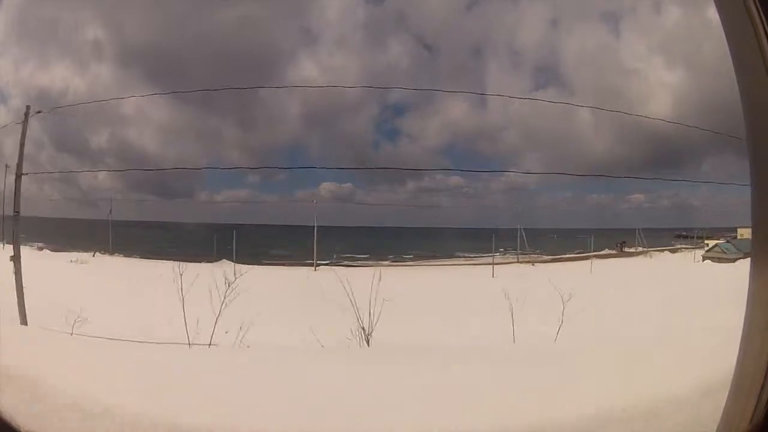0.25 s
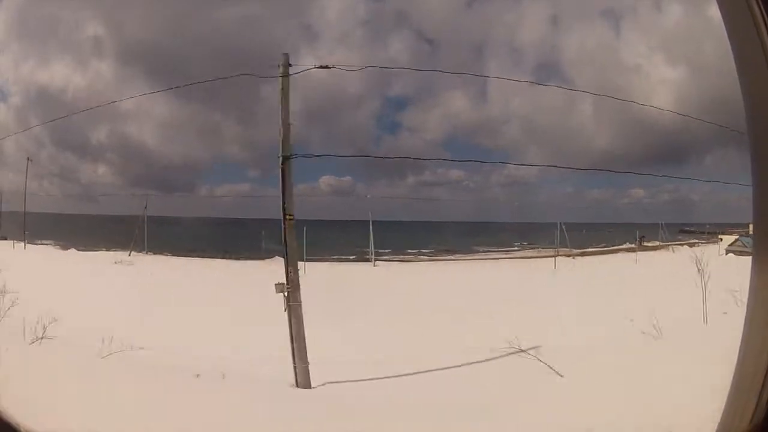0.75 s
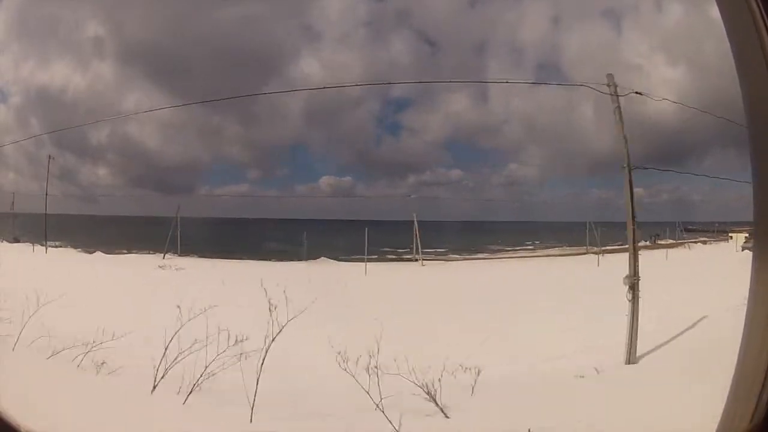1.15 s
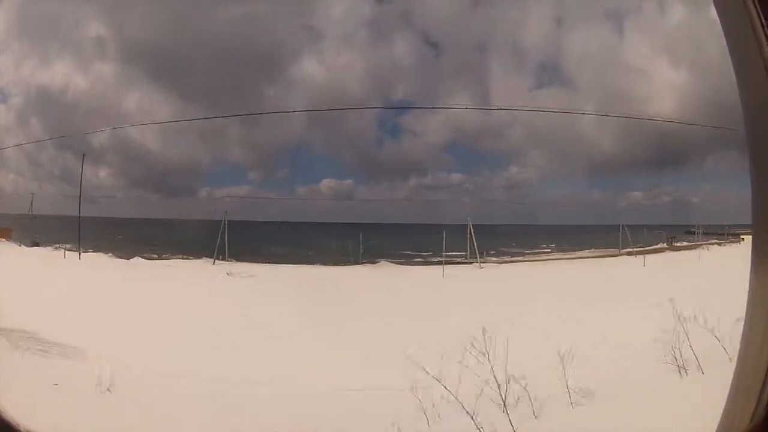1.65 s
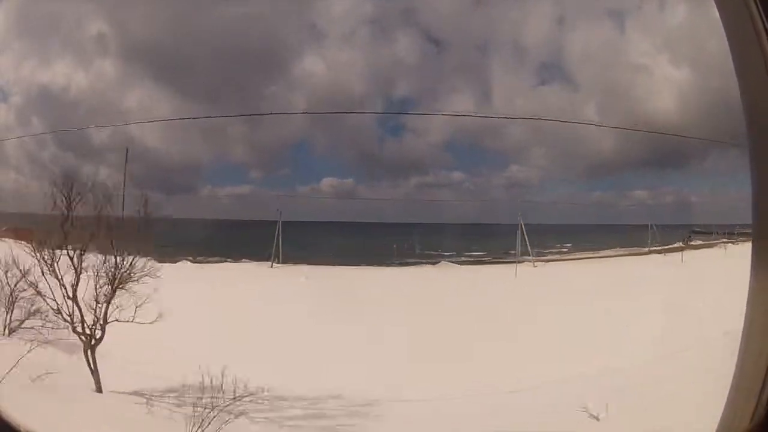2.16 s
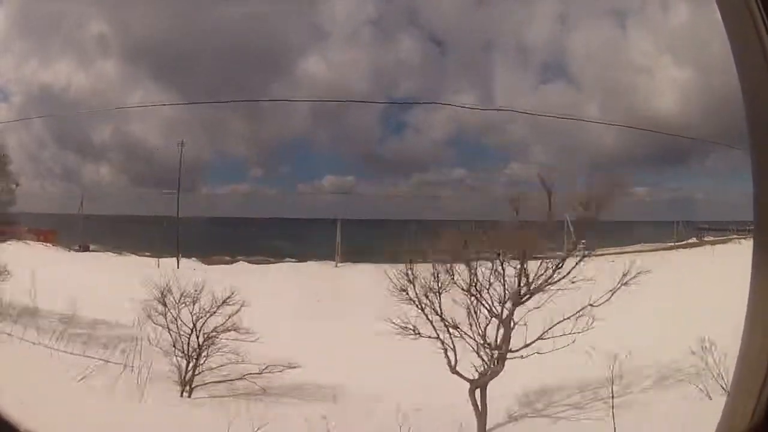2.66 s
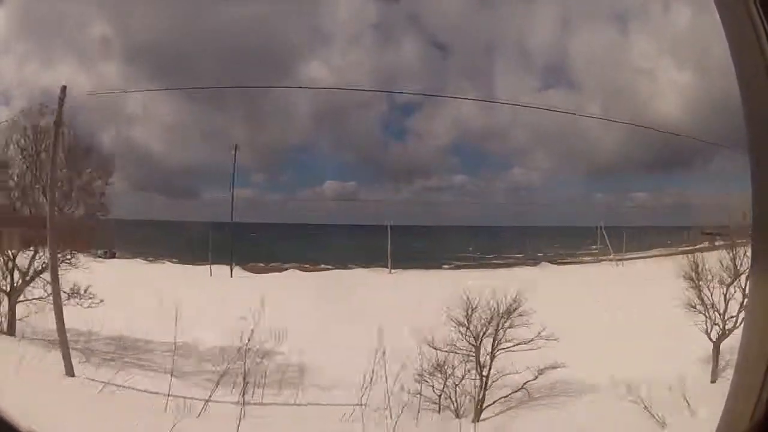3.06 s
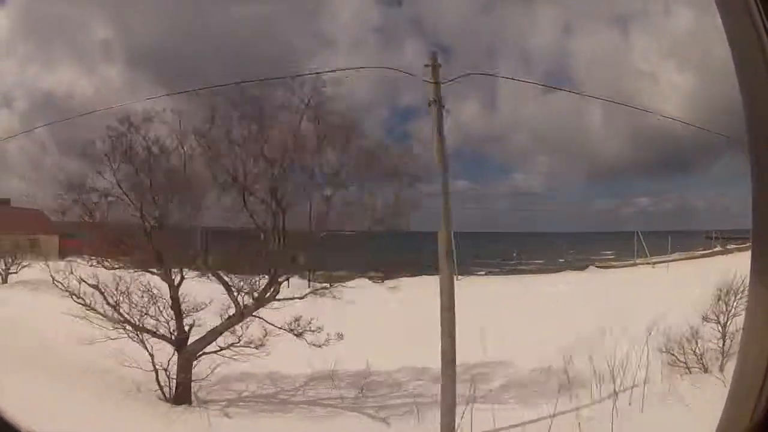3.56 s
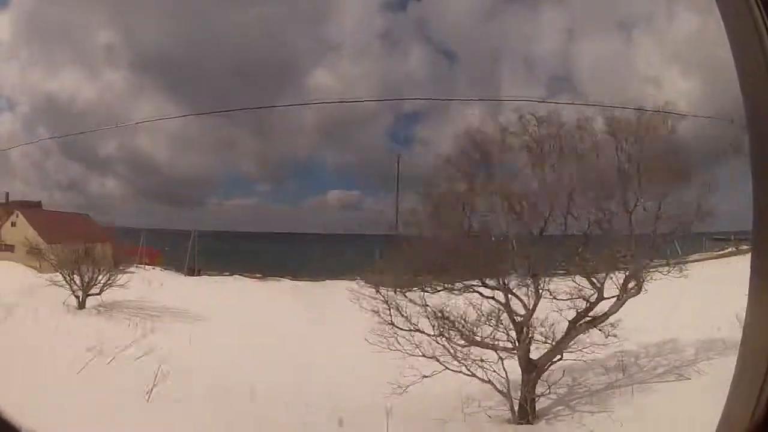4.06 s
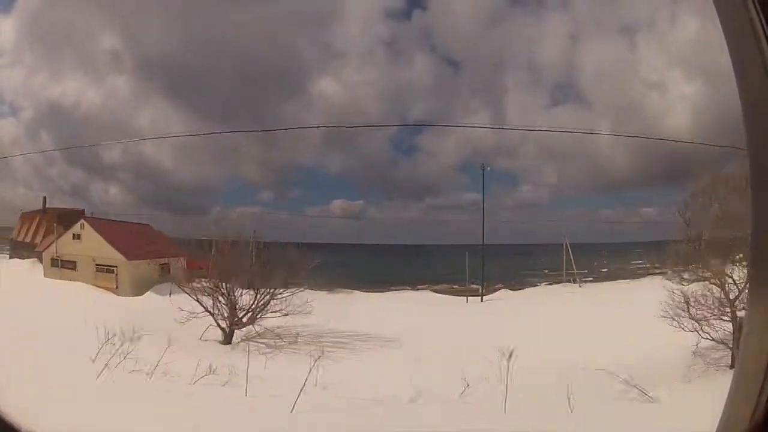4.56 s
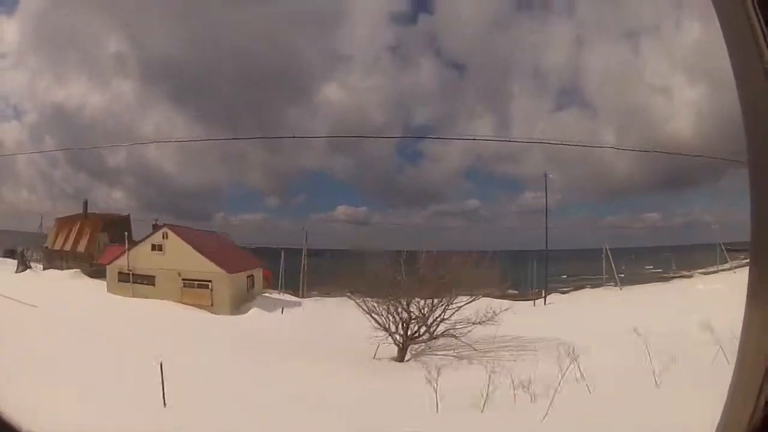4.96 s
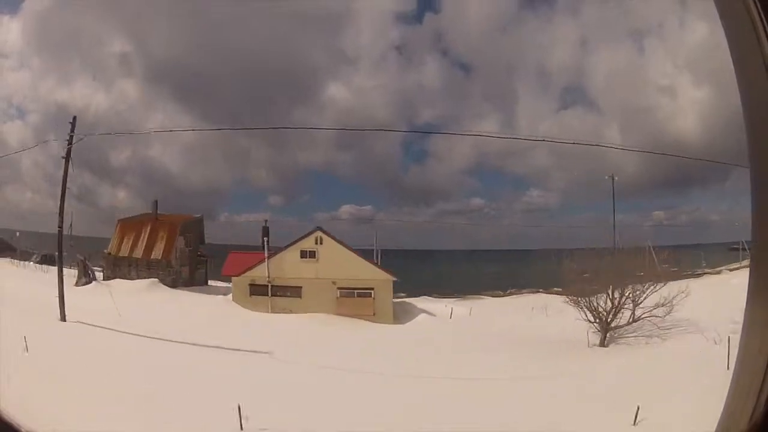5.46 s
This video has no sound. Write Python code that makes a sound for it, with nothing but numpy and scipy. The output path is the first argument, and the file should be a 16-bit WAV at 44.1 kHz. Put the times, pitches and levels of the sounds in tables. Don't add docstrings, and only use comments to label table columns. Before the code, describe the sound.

Heard close to a window inside a small diesel railcar, a low wheel rumble runs throughout. The engine is almost hidden at first, then revs up from about one and a half seconds, peaks, drops slightly and settles into a booming drone. A loose sash clacks and a latch ticks in irregular groups, with soft rail-joint thuds beneath. The muffled microphone adds a coarse, gritty edge.

```python
import sys
import numpy as np
from scipy import signal
from scipy.io import wavfile
from scipy.ndimage import uniform_filter1d

SR = 44100
rng = np.random.default_rng(int(sys.argv[2]) if len(sys.argv) > 2 else 0)


def decibels_to_gain(level_db):
    exponent = np.asarray(level_db, float) / 20
    return 10 ** exponent


def put_to_file(sound):
    columns = np.atleast_2d(sound).T
    safe = np.clip(columns, -1, 1)
    whole_steps = np.round(safe * 32767)
    wavfile.write(sys.argv[1], SR, whole_steps.astype(np.int16))


N = 251811


def evened(x):
    return x / np.sqrt(np.mean(x ** 2) + 1e-20)


def curve(rows, s):
    t, *columns = np.transpose(rows)
    return [np.interp(s, t, c) for c in columns]


def read(points, hz):
    f, level_db = np.transpose(points)
    return np.interp(np.log(hz + 1), np.log(f + 1), level_db, -120, -120)


def drift(rate_hz):
    return evened(signal.lfilter(*signal.butter(2, rate_hz, fs=SR), rng.standard_normal(N)))


def noise(points, size, patchy_db, tilt_db=None):
    hop = size // 4
    frames = N // hop + 5
    hz = np.fft.rfftfreq(size, 1 / SR)
    real, imag, patches = rng.standard_normal((frames, len(hz), 3)).T
    patches = uniform_filter1d(patches, size=6, axis=0)
    patches = evened(uniform_filter1d(patches, size=8, axis=1))
    level_db = read(points, hz)[:, None] + patchy_db * patches
    if tilt_db is not None:
        above_knee = np.clip((hz[:, None] - 2800) / 1000, 0, 1)
        level_db += above_knee * tilt_db[np.minimum(np.arange(frames) * hop, N - 1)]
    spectra = (real + 1j * imag) * decibels_to_gain(level_db)
    return evened(signal.istft(spectra, nperseg=size, noverlap=size - hop)[1][:N])


def resonate(x, hz, width_hz):
    b, a = signal.iirpeak(hz, hz / width_hz, SR)
    return signal.lfilter(b, a, signal.lfilter(b, a, x))


def ring(hz, t60_s, rise_s=.0002):
    t = np.arange(4000) / SR
    return decibels_to_gain(-60 * t / t60_s) * (1 - np.exp(-t / rise_s)) * np.sin(2 * np.pi * hz * t)


# time_s, cycle_hz (four-stroke cycles)
ENGINE_SPEED = [(0.0, 10.802), (0.9, 11.237), (1.3, 11.515), (1.55, 11.887), (1.75, 12.796), (1.95, 13.548),
                (2.15, 14.381), (2.35, 15.112), (2.47, 15.005), (2.6, 14.131), (2.8, 13.757), (3.2, 13.726),
                (3.7, 13.685), (4.1, 13.705), (4.45, 13.786), (4.7, 13.772), (5.1, 13.821), (5.71, 13.872)]
# time_s, effort_db, lope_db
ENGINE_LOAD = [(0, -85, -62), (1.42, -26, -44), (1.6, -26, -38), (1.7, -17.5, -32), (1.9, -14.5, -33.5),
               (2.02, -14.5, -34), (2.14, -21, -32), (2.4, -19, -30), (2.7, -21, -42.5), (3, -22, -43),
               (3.3, -22.5, -50), (3.7, -20, -36.5), (4.1, -16, -33), (4.4, -19, -32), (4.65, -13.7, -30),
               (5, -15.5, -28.5), (5.35, -13.5, -27.3), (5.71, -16.3, -26.8)]
# order (per cycle), level_db, boom_share
FIRING_ORDERS = [(6, -31, .2), (12, -20, 1), (18, -42, .3)]
# order (per cycle), level_db
UNEVEN_ORDERS = [(5, -9), (7, -7), (8, -4), (9, 0), (10, 1), (13, -4), (15, -8)]


def engine(s):
    cycle_hz = curve(ENGINE_SPEED, s)[0]
    turns = np.cumsum(cycle_hz) / SR
    effort_db, lope_db = curve(ENGINE_LOAD, s)
    firing_turn, uneven_turn, drive_turn = .19, .655, .269

    def floor_db(k):
        floor_hz, width_hz = 153.6, 9.5
        return -10 * np.log10(1 + ((k * cycle_hz - floor_hz) / width_hz) ** 2)

    def order(k, place, db):
        level = np.sqrt(2) * decibels_to_gain(db + .9 * drift(8))
        return level * np.cos(2 * np.pi * k * (turns + place) + .18 * drift(7))

    boom_db = effort_db + floor_db(12)
    panel_db = lope_db + 8 + floor_db(11)
    uneven_db = -30 + 0.62 * (lope_db + 30)
    slip_db = -30 * np.maximum(cycle_hz - 14.4, 0)
    drive_db = -25.4 + .27 * (effort_db + 21) + slip_db
    out = sum(order(k, firing_turn, db + share * (boom_db + 20.5)) for k, db, share in FIRING_ORDERS)
    out -= sum(order(k, uneven_turn, db + uneven_db) for k, db in UNEVEN_ORDERS)
    out -= order(11, uneven_turn, panel_db)
    return out + order(14, drive_turn, drive_db) + order(16, drive_turn, drive_db - 9.5)


# peak_s, lift_db, rise_s, fall_s
SWAY_LIFTS = [(0.358, 3, 0.053, 0.054), (1.12, 2.5, 0.042, .12), (1.46, 1.5, .03, 0.053),
              (1.67, 6.5, 0.017, 0.13), (1.92, 4.5, 0.016, 0.057), (5.4, 1, .08, .1), (2.68, 3, 0.091, .04),
              (2.785, 7.5, .035, 0.095), (3.0, 3, 0.047, .08), (3.951, 5.5, 0.16, 0.24),
              (4.2, 3, 0.047, 0.027), (5.04, 2, 0.2, 0.19)]


def sway(s):
    return sum(db * np.exp(-((s - t) / np.where(s < t, rise_s, fall_s)) ** 2)
               for t, db, rise_s, fall_s in SWAY_LIFTS)


# time_s, level_db
TRACK_ROUGHNESS = [(0, -4), (1.0, -3), (1.5, -1), (2.0, 1), (2.8, 0.5), (3.1, -3), (3.6, -0.5), (4.5, -0.5),
                   (5.71, -1.5)]
# freq_hz, density_db (per Hz)
CHASSIS_SPECTRUM = [(7.1, -49), (12, -12.5), (75, -5.5), (102, -13.5), (130, -3), (170, -13.5), (290, -120)]
# freq_hz, density_db (per Hz)
BODY_SPECTRUM = [(60, -41.5), (100, -16), (160, -6.5), (230, -11.5), (300, -15), (400, -19), (600, -23),
                 (780, -24.5), (950, -31), (1100, -37), (1200, -47), (1300, -44.5), (1700, -60.5)]
# freq_hz, width_hz, level_db
WALL_PANELS = [(433.6, 70, -8), (557, 94, -10.5), (733.6, 120, -9.5)]


def rolling(s):
    track_db = curve(TRACK_ROUGHNESS, s)[0]
    bass_db = -24.5 + 0.6 * track_db + .25 * sway(s)
    body_db = -25 + track_db + .3 * sway(s)
    body = noise(BODY_SPECTRUM, size=1024, patchy_db=0.5)
    body += sum(decibels_to_gain(db - 6.5) * evened(resonate(rng.standard_normal(N), hz, width_hz))
                for hz, width_hz, db in WALL_PANELS)
    lumps_db = 0.96 * drift(10.5)
    bass = noise(CHASSIS_SPECTRUM, size=4096, patchy_db=0.9)
    return decibels_to_gain(bass_db) * bass + decibels_to_gain(body_db + 2.5 + lumps_db) * body


# start_s, level_db, length_s
RAIL_JOINTS = [(.31, -27, .09), (1.018, -23, .1), (1.42, -26, .05), (2.17, -28, .1), (3.236, -25, .07),
               (4.35, -24.5, .065), (5.058, -25, .05), (5.465, -28, .04)]
# freq_hz, density_db (per Hz)
JOINT_SPECTRUM = [(120, -38), (250, -2), (400, -5), (700, -3), (900, -11.5), (1100, -19.5), (1300, -37.5),
                  (1700, -62)]


def joints(s):
    shape = 0
    for t, db, length_s in RAIL_JOINTS:
        attack = np.clip((s - t) / .004, 0, 1)
        shape = shape + decibels_to_gain(db) * attack * np.exp(-np.maximum((s - t) / length_s, 0) ** 2)
    return decibels_to_gain(1.05) * shape * noise(JOINT_SPECTRUM, size=512, patchy_db=-1.5)


# start_s, peak_db
SASH_CLACKS = [(0.2533, -38), (0.3706, -33), (0.4823, -34), (0.7667, -35), (0.8794, -33), (1.4656, -35),
               (1.5983, -34), (1.7235, -30), (1.8542, -32), (1.9809, -33), (2.4463, -34), (2.5696, -41),
               (2.7003, -30), (2.83, -30), (2.9622, -31), (3.2311, -40), (3.3583, -42), (3.691, -40),
               (3.8187, -33), (3.9479, -28), (4.0806, -30), (4.2128, -35), (4.811, -41), (4.9362, -31),
               (5.0589, -29), (5.1921, -41), (5.465, -43)]
# start_s, peak_db
LATCH_TICKS = [(0.2159, -38), (0.3386, -37), (0.4618, -36), (0.595, -38), (0.7412, -42), (1.1697, -39),
               (1.4376, -38), (1.507, -41), (1.5738, -37), (1.8402, -40), (2.2503, -43), (2.4074, -39),
               (2.5411, -39), (2.6733, -36), (2.9507, -38), (3.0954, -42), (3.3303, -45), (3.4206, -41),
               (3.4555, -46), (3.6666, -39), (3.7863, -40), (3.9255, -30), (4.1879, -36), (4.4548, -42),
               (4.8968, -39), (5.0325, -35), (5.1696, -35), (5.3058, -39), (5.4425, -41), (5.5568, -37)]
# freq_hz, level_db, t60_s
FRAME_MODES = [(1840, -2, 0.097), (2350, -5, 0.047), (2836, 4, 0.094), (3165, 13.5, 0.024)]


def clacks():
    out = np.zeros(N + 8000)
    luck = rng.uniform(-1.16, 1, (len(SASH_CLACKS), 8))
    contact = np.zeros(4000)
    contact[0] = 8.5
    snap = signal.lfilter(*signal.butter(2, [2600, 7000], "band", fs=SR), contact)
    snap += .5 * ring(4950, .011) + .2 * ring(5800, .006)
    snap += 2.4 * ring(2400, .007, rise_s=.0005) + .8 * ring(4050, .013) + .5 * ring(3200, .006)
    blow = ring(670, .014, rise_s=.0007)
    for (t, db), r in zip(SASH_CLACKS, luck):
        frame = sum(decibels_to_gain(mode_db + 3 * q) * ring(hz * (1 + 0.026 * q), t60_s, rise_s=0.0018)
                    for (hz, mode_db, t60_s), q in zip(FRAME_MODES, r))
        knock = ring(430 * (1 + 0.14 * r[6]), 0.14, rise_s=0.0023)
        knock += 0.33 * ring(760 * (1 + 0.15 * r[7]), 0.12, rise_s=0.0033)
        sound = decibels_to_gain(-1) * snap + decibels_to_gain(-14.5) * frame + decibels_to_gain(8) * knock
        sound += decibels_to_gain(19 - .5 * (db + 32)) * blow
        out[round((t + .0013) * SR):][:len(sound)] += decibels_to_gain(db) * sound
    for (t, db), r in zip(LATCH_TICKS, rng.uniform(-1.8, 1, (len(LATCH_TICKS), 2))):
        sound = ring(3890 * (1 + .02 * r[0]), .016, rise_s=.0004)
        sound += 1.5 * ring(3200 * (1 + .04 * r[1]), .008) + .8 * ring(2450, .007)
        out[round((t + .001) * SR):][:len(sound)] += decibels_to_gain(db + 1) * sound
    return out[:N]


# freq_hz, density_db (per Hz)
BUZZ_SPECTRUM = [(650, -30), (1100, 1.5), (1240, -25.5), (1540, -11), (2220, -4.5), (2600, -12.5),
                 (2970, -8.5), (3450, -15.5), (3950, -13), (4360, -18.5), (5020, -20), (6000, -29),
                 (7800, -59.5), (13200, -120)]
# time_s, level_db
SQUEAL_LEVEL = [(1.96, -80), (2.03, -60), (2.14, -57), (2.22, -61), (2.27, -80)]


def rattle(s):
    after = sum(decibels_to_gain(db + 31) * (s > t) * np.exp(-abs(s - t) / .025) for t, db in SASH_CLACKS)
    after_db = 10 * np.log10(1 + after)
    growth_db = 0.22 * (s - 3)
    shake_db = -50.5 + 0.58 * curve(TRACK_ROUGHNESS, s)[0] + sway(s) + after_db + growth_db
    drowned_db = 1.1 * np.minimum(s, 2.5)
    bright_db = .5 * sway(s) - .8 * after_db - drowned_db
    buzz = noise(BUZZ_SPECTRUM, size=256, patchy_db=0.3, tilt_db=bright_db - np.median(bright_db))
    buzz = buzz * decibels_to_gain(1.4 * drift(55))

    taps_per_s = 160
    hits = decibels_to_gain(2.9 * np.minimum(rng.exponential(1, N), 4)) * (rng.random(N) < taps_per_s / SR)
    modes = [*FRAME_MODES, (3950, -6.5, 0.024)]
    part = rng.integers(0, len(modes), N)
    taps = 0
    for k, (hz, db, t60_s) in enumerate(modes):
        tap = decibels_to_gain(db) * ring(hz, 0.083 * t60_s, rise_s=0.00031)
        taps = taps + signal.oaconvolve(hits * (part == k), tap)[:N]

    squeal = sum(decibels_to_gain(db) * evened(resonate(rng.standard_normal(N), hz, 70))
                 for hz, db in [(4330, -7), (4480, -5), (4700, -8), (4100, -7)])
    tone = np.sin(2 * np.pi * 4335 * s + 1.1 * drift(15))
    squeal += 1.1 * np.exp(-((s - 2.135) / .07) ** 2) * tone
    chatter = decibels_to_gain(shake_db + 2.5) * (buzz + decibels_to_gain(-11.5) * evened(taps))
    return chatter + squeal * decibels_to_gain(curve(SQUEAL_LEVEL, s)[0])


# freq_hz, width_hz, level_db
WHINE_LINES = [(1452, 40, -66), (2295, 70, -63)]


def whines():
    return sum(decibels_to_gain(db) * evened(resonate(rng.standard_normal(N), hz, width_hz))
               for hz, width_hz, db in WHINE_LINES)


def scene():
    s = np.arange(N) / SR
    return (engine(s) + rolling(s) + joints(s) + rattle(s) + clacks() + whines())[None]


def top_cut(x):
    return signal.sosfilt(signal.butter(12, 16430, fs=SR, output="sos"), x)


def record(dry):
    held_rate_hz, hold, hiss_db, edge_hz = 12000, 4, -67, 15500
    longer = np.pad(dry, ((0, 0), (0, 2000)), "reflect")
    longer = longer + decibels_to_gain(hiss_db) * rng.standard_normal(longer.shape)
    common = np.gcd(held_rate_hz, SR)
    coarse = signal.resample_poly(longer, held_rate_hz // common, SR // common, axis=1,
                                  window=("kaiser", 8))
    held = np.repeat(coarse, hold, axis=1)
    common = np.gcd(held_rate_hz * hold, SR)
    out = signal.resample_poly(held, SR // common, held_rate_hz * hold // common, axis=1)
    lowpass = signal.firwin(301, edge_hz, window=("kaiser", 6), fs=SR)
    out = signal.oaconvolve(out, lowpass[None], "same")
    return top_cut(out[:, 1:N + 1])


dry = scene()
out = record(dry)
put_to_file(out)
```